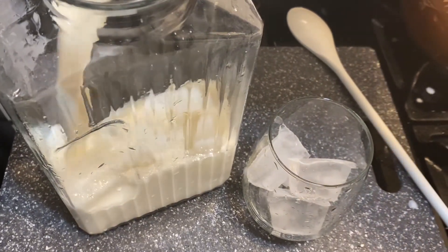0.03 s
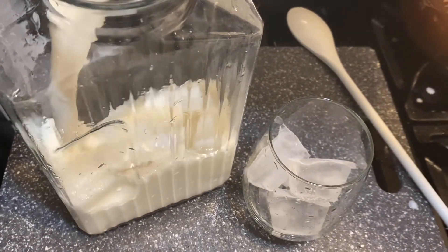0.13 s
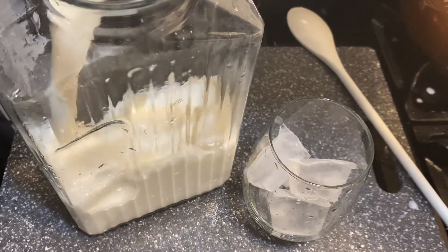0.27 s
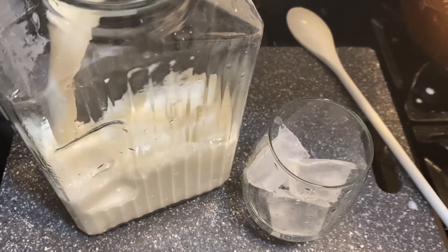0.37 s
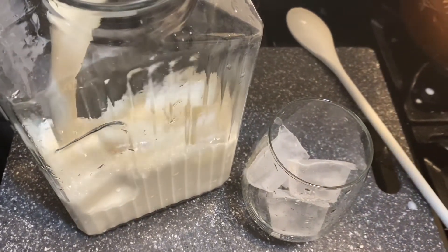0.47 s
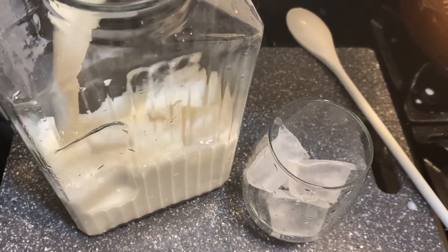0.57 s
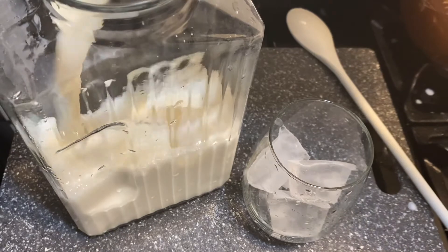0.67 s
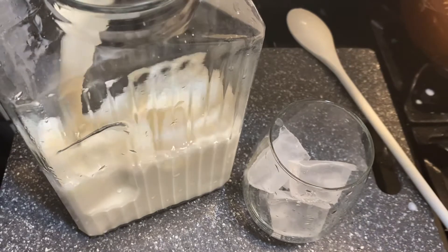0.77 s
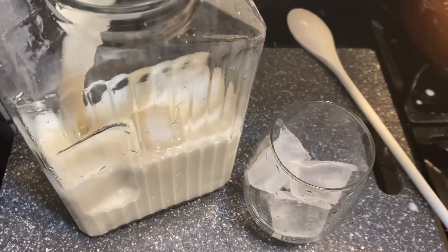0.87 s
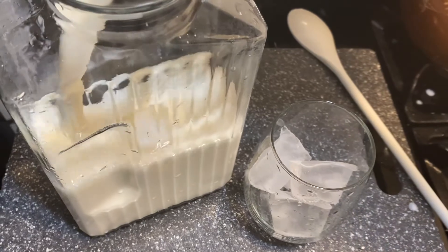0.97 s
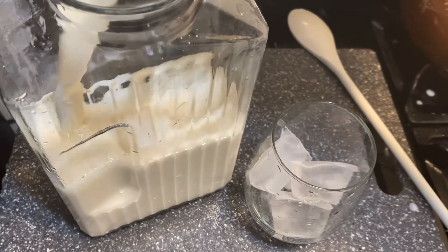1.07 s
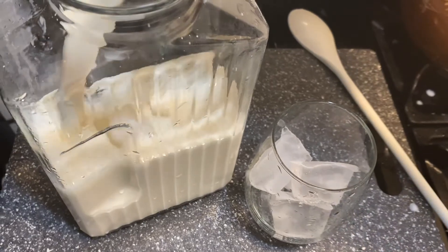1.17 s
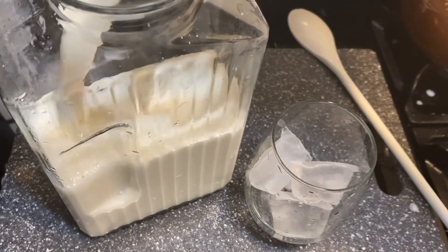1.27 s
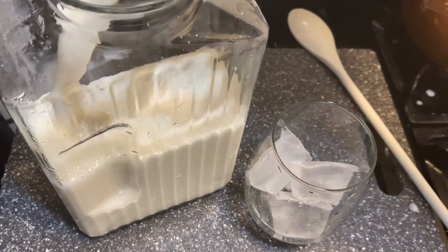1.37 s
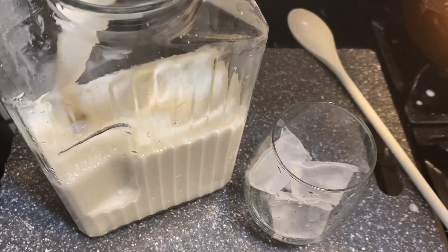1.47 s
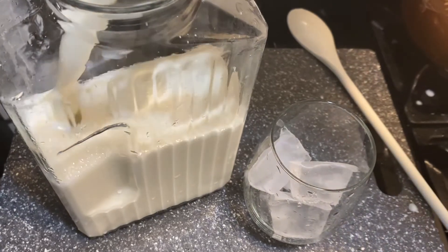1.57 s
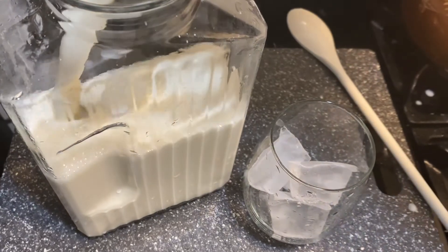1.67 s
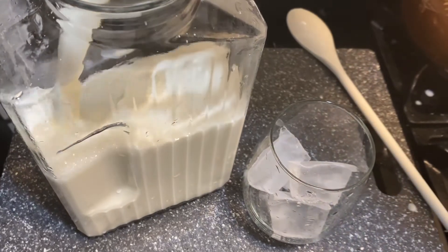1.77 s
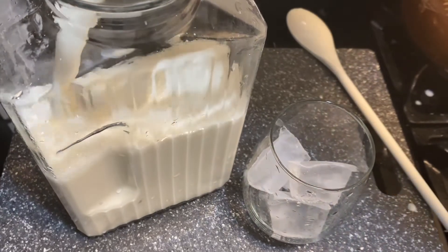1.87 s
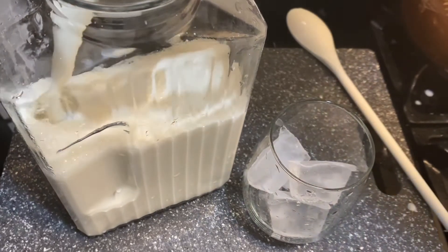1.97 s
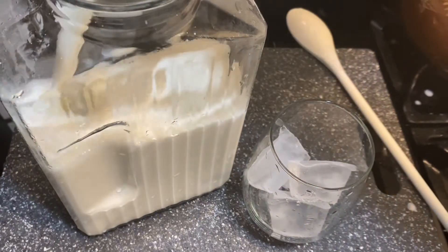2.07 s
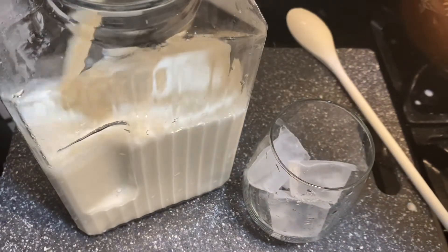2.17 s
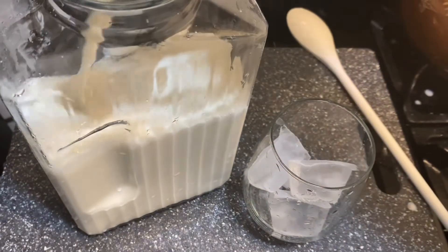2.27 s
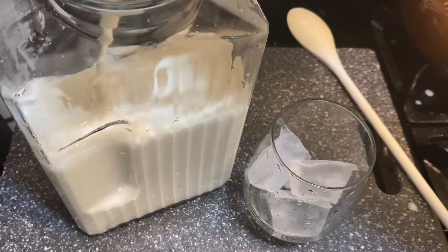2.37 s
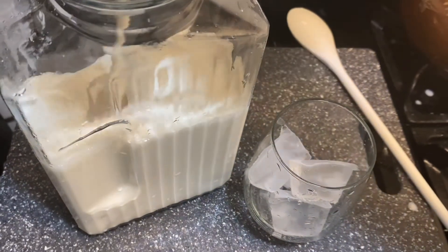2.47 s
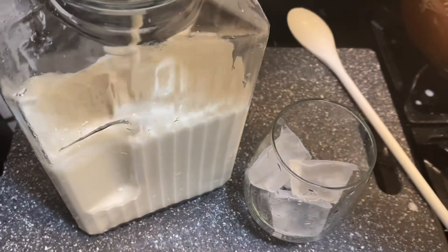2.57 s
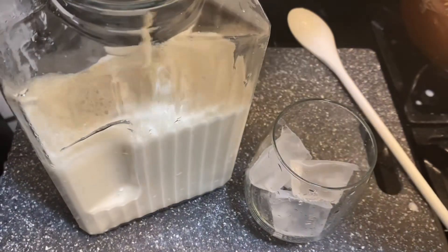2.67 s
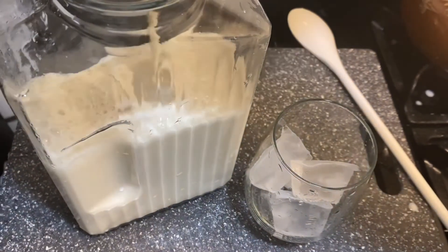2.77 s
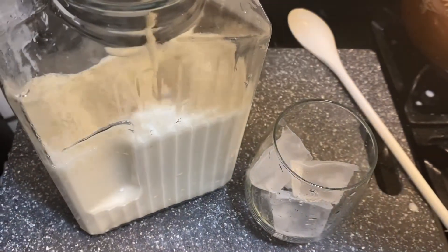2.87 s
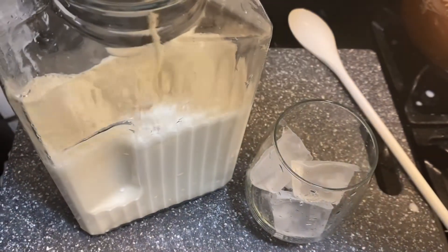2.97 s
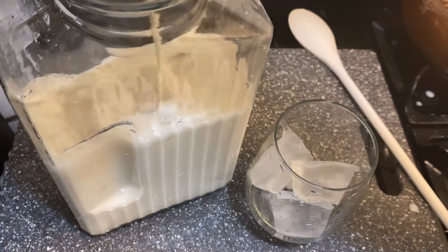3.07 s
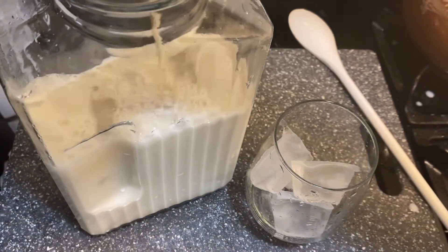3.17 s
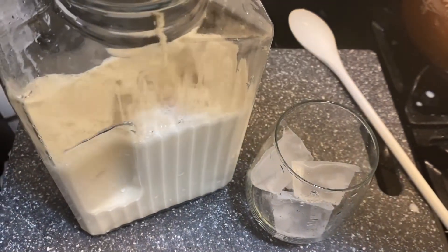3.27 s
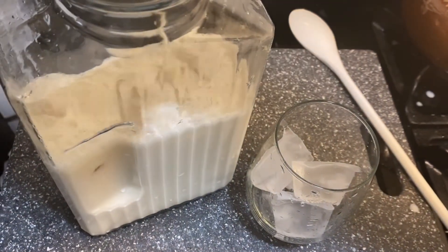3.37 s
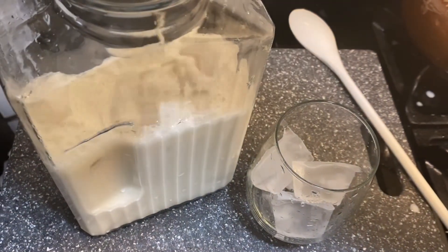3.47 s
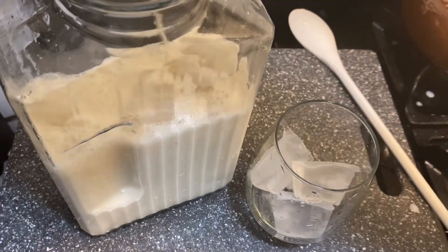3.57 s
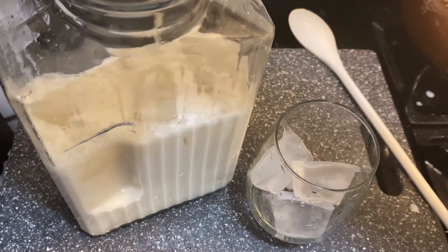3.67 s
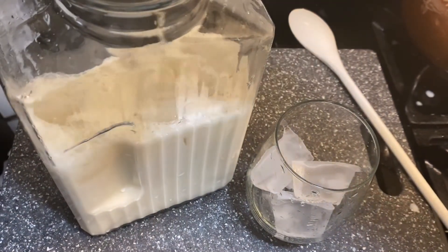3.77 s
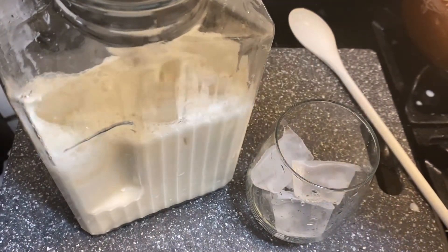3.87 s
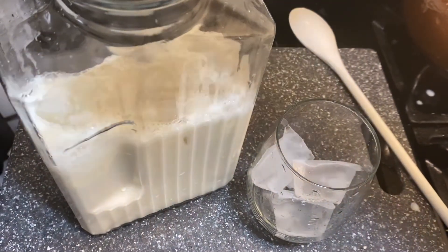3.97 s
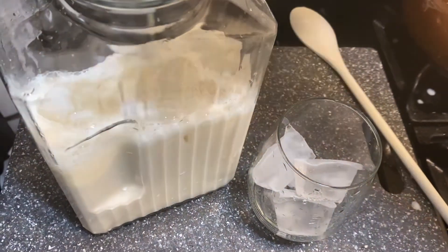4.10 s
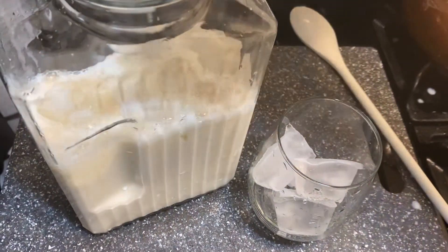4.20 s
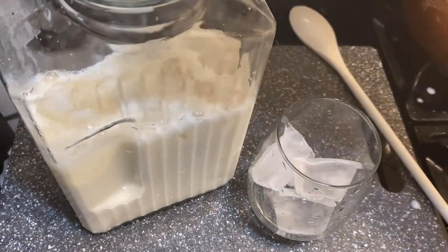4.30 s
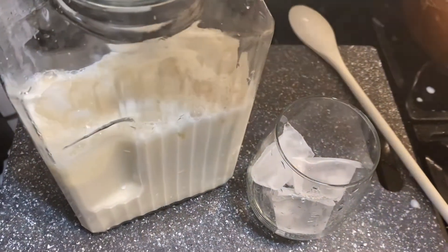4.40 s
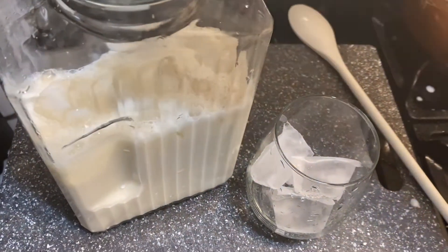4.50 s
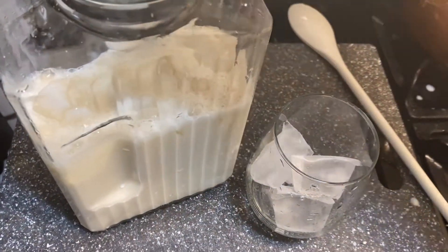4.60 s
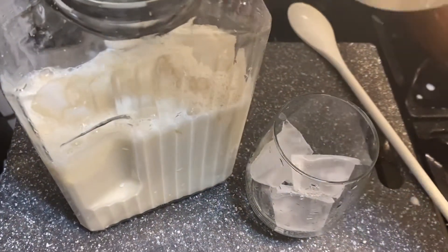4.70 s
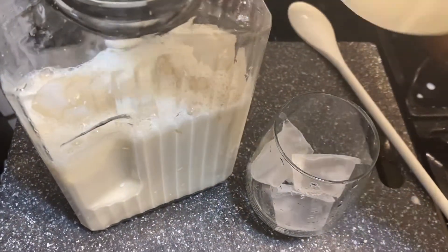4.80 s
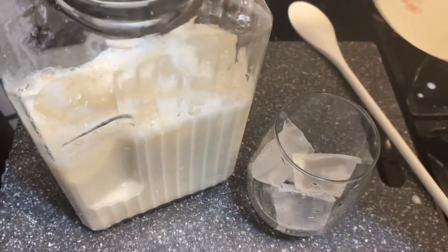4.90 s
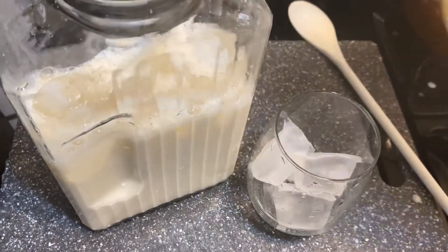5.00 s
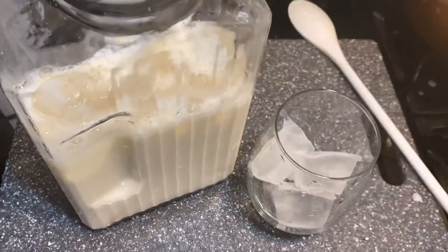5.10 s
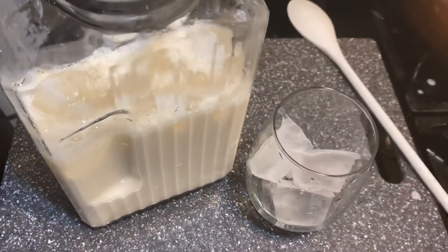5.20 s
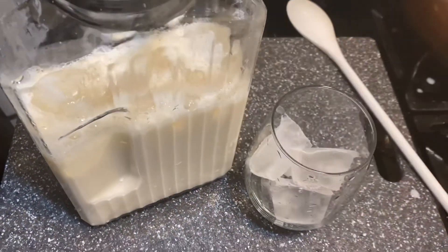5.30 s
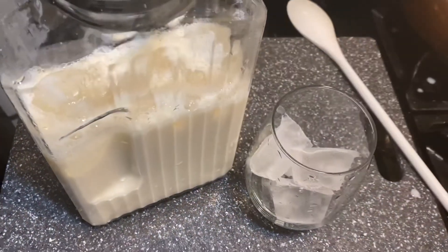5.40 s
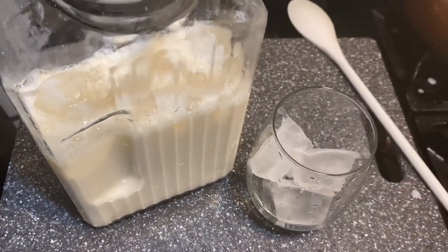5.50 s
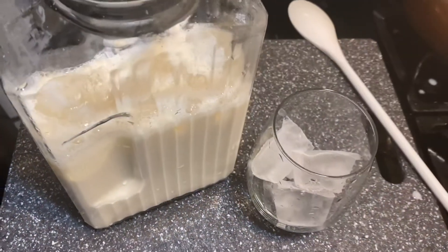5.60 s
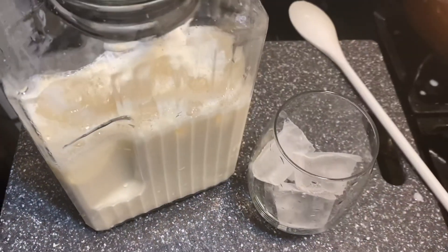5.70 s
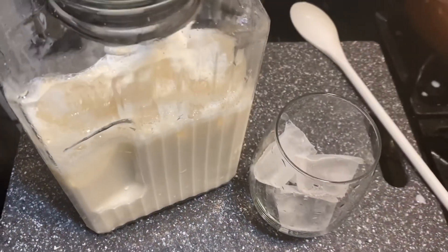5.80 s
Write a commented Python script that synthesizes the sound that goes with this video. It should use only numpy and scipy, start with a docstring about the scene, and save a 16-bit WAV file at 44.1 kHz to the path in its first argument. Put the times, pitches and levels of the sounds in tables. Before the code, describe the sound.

A creamy pour splats in irregular gobs inside a half-filled glass jar, the air glugging at a slowly rising low pitch, with fine spatter and short glassy resonance. The stream breaks into sparse drops and nearly stops. Then a woody, rattling bump with a low boom and brief scrape comes from the counter, slightly right. Near microphone, short dry room echo, soft fridge hum beneath.

```python
"""A thick liquid is poured in uneven gulps into a glass pitcher on a kitchen counter.
Gobs slap the surface: a trapped bubble rings, the contact cracks, a noisy splash follows and the glass is struck.
The air above the liquid glugs as decaying notes, higher as the pitcher fills; small drops patter in between.
Then the emptied container is set down and slid: ringing counter modes, a late boom, rattle and scrape noise.
A refrigerator hums in wavering tones over soft room noise."""
import sys
import numpy as np
from scipy import signal
from scipy.fft import rfft, irfft, next_fast_len
from scipy.io import wavfile

SR = 44100
rng = np.random.default_rng(int(sys.argv[2]) if len(sys.argv) > 2 else 0)


def persist_wave(psi):
    """Save psi, clipped to +-1, as 16-bit WAV."""
    counts = np.round(np.clip(psi, -1, 1) * 32767).astype(np.int16)
    wavfile.write(sys.argv[1], SR, np.atleast_2d(counts).T)


N = 257984


def amp(db):
    """Gain of a level in dB."""
    return 10 ** (np.asarray(db) / 20)


def rms_one(x):
    """Scaled to rms 1."""
    return x / np.sqrt(np.mean(x ** 2) + 1e-20)


def in_time(rows):
    """Columns of a curve table, sample by sample."""
    s, *columns = np.transpose(rows)
    return [np.interp(np.arange(N) / SR, s, c) for c in columns]


def at_hz(points, hz):
    """A spectrum table read on a logarithmic pitch axis."""
    table_hz, values = np.transpose(points)
    return np.interp(np.log(hz), np.log(table_hz), values)


def add(track, s, sound):
    """Mixes a sound in at s seconds."""
    i = round(s * SR)
    track[..., i:i + sound.shape[-1]] += sound[..., :N - i]


def butter(x, hz, kind, order=2):
    """Butterworth filter."""
    return signal.sosfilt(signal.butter(order, hz, kind, fs=SR, output="sos"), x)


def sine(turns):
    """A sine wave whose phase is counted in full turns."""
    return np.sin(2 * np.pi * turns)


def swell_in(t, rise_s):
    """A smooth rise from 0 towards 1."""
    return 1 - np.exp(-t / rise_s)


def ring(x, hz, t60):
    """A unit click sets a sine of height 1 ringing; it falls 60 dB in t60 seconds."""
    r, w = amp(-60 / (t60 * SR)), 2 * np.pi * hz / SR
    return signal.lfilter([0, np.sin(w)], [1, -2 * r * np.cos(w), r * r], x + 1e-18)


def drift(rate_hz):
    """Slow random wandering of rms 1: low-passed noise made at every 40th sample, then joined by lines."""
    r = np.exp(-80 * np.pi * rate_hz / SR)
    noise = rng.standard_normal(N // 40 + 2002)
    slow = signal.lfilter([1], [1, -2 * r, r * r], noise)[2000:]   # without the filter's start
    return np.interp(np.arange(N) / 40, np.arange(len(slow)), rms_one(slow))


def pair(length, alike):
    """Stereo white noise; likeness 1 makes both sides equal, 0 unrelated, -1 opposite."""
    mid, side = rng.standard_normal((2, length))
    alike = np.clip(alike, -1, 1)
    return np.sqrt(.5 + alike / 2) * mid + np.sqrt(.5 - alike / 2) * side * [[1], [-1]]


def coloured(spectrum, likeness, patchy_db):
    """Half-octave bands of stereo noise, each with its level, flicker and likeness; rms 1."""
    out, edges = 0, 25 * 2 ** np.arange(0, 9.6, .5)
    white = rng.standard_normal((2, 2, N))   # neighbouring bands use different noise
    for k, (low, high) in enumerate(zip(edges, edges[1:])):
        mid, side = butter(white[k % 2], [low, high], "band")
        hz = np.sqrt(low * high)
        alike = np.clip(at_hz(likeness, hz), -1, 1)
        gain = amp(at_hz(spectrum, hz) + patchy_db * drift(8.4))
        out = out + gain * (np.sqrt(1 + alike) * mid + np.sqrt(1 - alike) * side * [[1], [-1]])
    return rms_one(out)


# Colour of the room tone. Each row: pitch in Hz, relative level in dB per Hz.
KITCHEN = [(20, -25), (59, -6.5), (175, -11), (242, -8.5), (439, -17.5), (607, -20), (1650, -30),
           (2600, -36.5), (4900, -40), (7500, -40.5), (11000, -50), (16000, -50.5)]
# How alike the room tone is on both sides. Each row: pitch in Hz, likeness (1 is equal).
KITCHEN_LIKENESS = [(60, .9), (130, 0), (290, .7), (640, 0), (1400, 0), (3100, .5), (7000, .95)]
# Motor tones. Each row: pitch in Hz, speed of the wavering in Hz, level in dB.
HUM = [(65, 12, -64.5), (240.1, 20, -53.5), (415.5, 65, -63), (1630, 3.8, -74)]
KITCHEN_DB = -48   # level of the room tone


def refrigerator():
    """Motor tones that waver in strength and phase, over the room tone."""
    t, tones = np.arange(N) / SR, 0
    for hz, width_hz, db in HUM:
        waver = 1 + drift(width_hz) + 1j * drift(width_hz)
        tones = tones + amp(db) * (np.exp(2j * np.pi * hz * t) * waver).real
    return tones + amp(KITCHEN_DB) * coloured(KITCHEN, KITCHEN_LIKENESS, patchy_db=.4)


ROOM_T60_S, ROOM_DB, WALL_CUT_HZ = 0.18, -8.5, 2400   # echo decay, echo gain, dulling on each round


def room(x):
    """Eight feedback delays a side, duller on every round."""
    size = next_fast_len(N + SR)
    hz = np.fft.rfftfreq(size, 1 / SR)
    spectrum, out = rfft(x, size), np.zeros((2, len(hz)), complex)
    for k, lag in enumerate(rng.uniform(.012, .04, 16)):   # seconds
        dulling = 1 / (1 + 1j * hz / WALL_CUT_HZ)
        loop = amp(-60 * lag / ROOM_T60_S) * dulling * np.exp(-2j * np.pi * hz * lag)
        out[k % 2] += loop / (1 - loop) * (-1) ** (k // 2)
    return irfft(out * spectrum, size)[:, :N]


# Knocks of the container on the counter. Each row: start in seconds, level in dB,
# rattle in dB against that level, boom gain in dB against that level, favoured pitch in Hz.
KNOCKS = [(5.314, -27, 6, 7.5, 400), (5.336, -34, -2.5, 2, 200), (5.436, -40, -1.5, 5, 635),
          (5.542, -40, 3, 5, 416), (5.556, -35, -14, 9.5, 201), (5.576, -40.5, 5, 0, 378),
          (5.609, -39.5, -2.5, 1, 614)]
# Ringing modes of the counter. Each row: pitch in Hz, relative level in dB, seconds to fall 60 dB.
COUNTER = [(195, 5.5, 0.28), (290.4, -1, 0.21), (329.6, 4, 0.28), (407, -7, 0.58), (624, 2.5, 0.11),
           (815, -2, 0.12), (1610, -2, 0.14), (2520, 6, 0.065), (3010, -2, 0.081)]
# Boom of the cabinet. Each row: pitch in Hz, relative level in dB.
BOOM = [(70, 3.5), (116, -2.5)]
# Loudness of the slide. Each row: time in seconds, level in dB.
SLIDE = [(5.27, -54), (5.31, -40), (5.42, -38.5), (5.5, -46.5), (5.54, -41.5), (5.64, -43), (5.7, -67)]
# Colour of the scrape and rattle. Each row: pitch in Hz, relative level in dB per Hz.
SCRAPE = [(100, -17), (250, 6), (600, -5.5), (1300, -15.5), (2600, -20.5), (5000, -34), (15000, -47.5)]
CONTACT_S = 0.0016          # a knock swells briefly
FAVOUR_DB_PER_OCTAVE = 4.5  # modes far from the favoured pitch are weaker


def container():
    """Knocks ring the counter and rattle; the cabinet booms late; a soft scrape as it slides."""
    out, t = np.zeros((2, N)), np.arange(SR // 3) / SR
    (slide_db,) = in_time([(0, -120), (5.2, -120)] + SLIDE)
    rub = amp(slide_db)
    for s, peak_db, rattle_db, boom_db, favoured_hz in KNOCKS:
        blow = swell_in(t, CONTACT_S) * amp(rng.normal(0, 1.1, (2, 1)))
        rings = 0
        for hz, db, t60 in COUNTER:
            far_db = FAVOUR_DB_PER_OCTAVE * abs(np.log2(hz / favoured_hz))
            # each mode strays a little in pitch, and in phase between the sides
            turns = hz * rng.normal(1, 0.0152) * t + rng.random() + rng.normal(0, 0.037, (2, 1))
            rings = rings + blow * amp(db - far_db - 60 * t / t60) * sine(turns)
        late_swell = (t / 0.1) ** 2 * np.exp(2 - 2 * t / 0.054)
        boom = sum(amp(db) * late_swell * sine(hz * t + rng.random()) for hz, db in BOOM)
        add(out, s, amp(peak_db) * butter(rings, [170, 5000], "band") + amp(peak_db + boom_db) * boom)
        add(rub, s, amp(peak_db + rattle_db - 60 * t / 0.098))
    scrape = coloured(SCRAPE, [(100, 0.3), (3000, 0.67)], patchy_db=-1.5)
    rough = amp(2.66 * drift(40))
    return (out + rub * rough * scrape) * amp([[-1], [1]])   # slightly to the right


# Fine spatter between the gobs, and the murmur of the air.
# Each row: time in seconds, spatter level in dB, air murmur level in dB.
SPATTER = [(0, -54, -40), (.1, -55, -80), (.2, -39, -27), (.5, -51.5, -45), (.9, -37, -35),
           (1.3, -43.5, -41.5), (1.5, -52, -46.5), (1.7, -41, -35.5), (2.1, -43.5, -42.5),
           (2.3, -61.5, -52), (3, -59, -43), (3.6, -59, -62), (4.5, -66.5, -54.5)]


def spatter(level_db):
    """Small drops land at random; each swells and rings a few cycles."""
    sizes = amp(3.6 * np.minimum(rng.exponential(1, N), 4)) * rng.choice([-1, 1], N)
    born = rng.random(N) < 2600 * amp(4 * drift(12)) / SR   # about 2600 drops a second, in bursts
    pitches, dealt = np.geomspace(450, 4400, 16), rng.integers(0, 16, N)
    drops = []
    for k, hz in enumerate(pitches):
        clicks = sizes * born * (dealt == k)
        ringing = ring(ring(clicks, hz, 18.0 / hz), hz, 9.0 / hz)   # two in a row make the swell
        drops.append(rms_one(ringing) * (hz / 1000) ** -.7)
    sides = rng.uniform(.4, 1.6, 16)
    both = np.array([np.dot(sides, drops), np.dot(2 - sides, drops)])
    return amp(level_db) * rms_one(both)


# Low thumps of the pitcher under some gobs. Each row: start in seconds, level in dB.
THUMPS = [(0.289, -19.5), (0.717, -30.5), (0.831, -23.5), (0.899, -24), (1.163, -27.5), (1.304, -27),
          (1.425, -26.5), (1.574, -17.5), (1.6559, -25), (1.7349, -16), (1.8434, -26.5), (1.969, -25.5),
          (2.207, -34), (4.13, -30.5)]
THUMP_HZ, THUMP_T60_S = 193.2, 0.16   # pitch, seconds to fall 60 dB


def thumps():
    """One low mode swells and dies at each thump."""
    out, t = np.zeros(N), np.arange(SR // 5) / SR
    for s, peak_db in THUMPS:
        add(out, s, amp(peak_db - 60 * t / THUMP_T60_S) * swell_in(t, 0.012) * sine(THUMP_HZ * t))
    return out


# Cavities that open behind a gob and fall in pitch.
# Each row: start in seconds, level in dB, first pitch in Hz, last pitch in Hz.
PLUNGES = [(0.5335, -31.5, 1600, 606), (1.4226, -28.5, 1520, 504.7), (1.7389, -5.5, 1876, 540),
           (2.209, -37, 1630, 636), (2.736, -42, 1490, 592)]
PLUNGE_FALL_S, PLUNGE_T60_S = 0.0011, 0.053   # time constant of the fall, seconds to fall 60 dB
BUBBLE_SWELL_S = 0.00025   # onset of plunges and trapped bubbles


def plunges():
    """A note that drops quickly and dies."""
    out, t = np.zeros(N), np.arange(SR // 10) / SR
    for s, peak_db, start_hz, end_hz in PLUNGES:
        turns = end_hz * t + (start_hz - end_hz) * PLUNGE_FALL_S * swell_in(t, PLUNGE_FALL_S)
        add(out, s, amp(peak_db - 60 * t / PLUNGE_T60_S) * swell_in(t, BUBBLE_SWELL_S) * sine(turns))
    return out


AFTER_COUNT, AFTER_WITHIN_S, AFTER_DB = 8, 0.03, -6.5   # bubbles per gob, time spread, dB against the splash
AFTER_RISE = 0.74      # the pitch rises by twice this share per second
BUBBLE_CYCLES = 22     # a bubble falls 60 dB in this many cycles
SPLASH_T60_S = 0.17    # seconds for a splash to fall 60 dB


def after_bubbles():
    """Each splash leaves a few bubbles of nearby size that ring briefly, rising in pitch."""
    out, t = np.zeros((2, N)), np.arange(SR // 32) / SR
    for s, peak_db, gob_hz, _, splash_db in SLAPS:
        for late, pitch, size, side in rng.random((AFTER_COUNT, 4)):
            hz, late_s = gob_hz * 2 ** (1.6 * (pitch - .4)), late * AFTER_WITHIN_S
            envelope = swell_in(t, 2 / hz) * amp(-60 * t * hz / BUBBLE_CYCLES)
            blip = envelope * sine(hz * t * (1 + AFTER_RISE * t))
            db = peak_db + splash_db + AFTER_DB + 12 * (size - .5) - 60 * late_s / SPLASH_T60_S
            add(out, s + 0.024 + late_s, amp(db) * blip * [[.5 + side], [1.5 - side]])
    return out


# Pushes on the air in the pitcher.
# Each row: time in seconds, level in dB, cross mode in dB against that level.
GLUGS = [(0.124, -26, -12), (0.152, -11.5, 1.5), (0.184, -13.5, 9), (0.234, -24, -14), (0.316, -11.5, 5.5),
         (0.433, -27.5, 12), (0.536, -50.5, 30), (0.631, -24, 5.5), (0.688, -43, 27.5),
         (0.763, -31.5, 12.5), (0.793, -21, 4), (0.817, -21.5, -11), (0.841, -17.5, -2), (0.887, -29, -6),
         (0.93, -33, 15.5), (1.167, -28.5, 10), (1.238, -32, 3.5), (1.31, -32.5, 15), (1.424, -30.5, 7),
         (1.578, -32.5, -9), (1.663, -40.5, 21.5), (1.746, -14.5, 6), (1.85, -22, -33), (1.982, -11.5, -11),
         (2.009, -13, -15), (2.035, -8.5, -11.5), (2.215, -35.5, -1.5), (2.262, -37, -17), (2.327, -38, 0),
         (2.44, -33.5, 3), (2.472, -21, -9), (2.501, -33, -5), (2.744, -24.5, -5.5), (2.853, -27.5, -7),
         (2.912, -24, -5.5), (3.061, -23.5, 5.5), (3.137, -27.5, -1.5), (3.586, -37.5, -8),
         (3.663, -40, -3), (3.857, -36, 0), (4.129, -35, -22), (4.376, -34, -28)]
# Note of the air as the pitcher fills. Each row: time in seconds, pitch in Hz.
AIR = [(0, 266.2), (.35, 280.6), (1.2, 303.6), (2, 342.5), (2.45, 355.2), (2.75, 371.7), (4.5, 378.2)]
GLUG_RISE_S, GLUG_T60_S = 0.0012, 0.084
# each glug starts sharp by a share, settles (time constant in seconds), and strays by up to a share
GLUG_SAG, GLUG_SAG_S, GLUG_SCATTER = 0.08, 0.015, 0.026
TWIN_GAP_HZ, TWIN_SHARE = 27, .55   # the air has a second mode close above
CROSS_HZ, CROSS_T60_S, CROSS_SCATTER = 558.8, 0.061, 0.035   # the cross mode strays by up to a share


def glugs(air_db):
    """The air swells into its twin note after each push and dies, with a cross mode sounding along."""
    out, t = np.zeros(N), np.arange(SR // 5) / SR
    for (s, peak_db, cross_db), phase in zip(GLUGS, rng.uniform(0, 2 * np.pi, (len(GLUGS), 3))):
        hz = np.interp(s, *np.transpose(AIR)) * (1 + GLUG_SCATTER * np.sin(phase[2]))
        bent = t + GLUG_SAG * GLUG_SAG_S * swell_in(t, GLUG_SAG_S)   # time runs fast at first
        swell = swell_in(t, GLUG_RISE_S) * amp(-60 * t / GLUG_T60_S)
        # the twins are opposed at first: swell, dip, return
        twins = swell * (1 - TWIN_SHARE * np.exp(2j * np.pi * TWIN_GAP_HZ * t))
        carrier = np.exp(2j * np.pi * (hz - TWIN_GAP_HZ / 2) * bent + 1j * phase[0])
        note = (twins / abs(twins).max() * carrier).real
        cross_hz = CROSS_HZ * (1 + CROSS_SCATTER * np.cos(phase[2]))
        cross_swell = swell_in(t, 0.0027) ** 2 * amp(cross_db - 60 * t / CROSS_T60_S)
        cross = cross_swell * np.sin(2 * np.pi * cross_hz * bent + phase[1])
        add(out, s - .005, amp(peak_db) * (note + cross))   # starts 5 ms ahead of the listed time
    # the stream keeps the air murmuring: narrow noise carried on the moving resonance
    carrier = np.exp(2j * np.pi * np.cumsum(in_time(AIR)[0]) / SR)
    murmur = carrier * (drift(61) + 1j * drift(24))
    return out + amp(air_db) * murmur.real / np.sqrt(2)


# Ringing modes of the glass. Each row: pitch in Hz, relative level in dB, seconds to fall 60 dB.
PITCHER = [(753, 0, .06), (936, 0, .06), (1292, -2, .045), (1555, 0, .055), (1825, -2, .05), (2312, 1, .05),
           (2910, 1, .04), (3381, 0, .035), (3900, -3, .03)]


def pitcher(x):
    """The glass adds its modes to what happens inside."""
    modes = sum(amp(db) * ring(x, hz, t60) * (-1) ** k for k, (hz, db, t60) in enumerate(PITCHER))
    return x + amp(-45) * modes


# Gobs hitting the surface. Each row: start in seconds, level in dB, bubble pitch in Hz,
# treble in dB against that level, splash in dB against that level.
SLAPS = [(0.1079, -7, 1355, -6.5, -1.5), (0.1384, -2.5, 3070, -22, -14), (0.151, -8.5, 3030, -50, -9),
         (0.18, -17.5, 580, -0.5, -11.5), (0.2311, -17.5, 1230, -29, -2.5), (0.2526, -15, 2090, -17, -11),
         (0.286, -10.5, 2360, -8, 1.5), (0.313, -7.5, 2850, -23, -14), (0.3914, -10, 1400, -11.5, -9.5),
         (0.429, -27.5, 3200, -50, 0), (0.4576, -18, 1440, -27, -16), (0.5334, -22, 916, -37, -1),
         (0.564, -22.5, 1430, -46, -11), (0.6204, -13, 1370, -28, -22.5), (0.6286, -7, 3150, -36, -19),
         (0.6798, -21.5, 905, -18, -0.5), (0.6934, -12, 1780, -11.5, -2), (0.7459, -1.5, 1570, -23, -8),
         (0.7633, -9.5, 3000, -39, -3), (0.787, -9, 850, -31, -22), (0.7909, -9.5, 2930, -48, -4),
         (0.829, -15, 850, -38, -3.5), (0.853, -31, 3730, -45, 11.5), (0.899, -21, 1350, -39, -3),
         (0.9363, -18.5, 1200, -47, -3), (0.9541, -19.5, 1460, -17, -6.5), (1.044, -32, 1587, -13, -6),
         (1.06, -12.5, 1390, -29, -20), (1.104, -23, 694, -25, -22), (1.163, -5, 1420, -20, -17),
         (1.2678, -13, 1280, -43, -16), (1.2993, -16.5, 1510, -14.5, 5), (1.3896, -26, 1620, -6.5, -1),
         (1.4237, -36, 716, -10, 7.5), (1.5197, -26, 920, -34, 0), (1.552, -25.5, 990, -10, 9),
         (1.574, -0.5, 2160, -9, -9), (1.5975, -12, 2290, -35, -7), (1.657, -10, 1860, -17, -3),
         (1.7387, -4.5, 1260, -28, -14.5), (1.8038, -20, 1500, -45, -9.5), (1.828, -36, 2485, -13, 10.5),
         (1.8453, -21, 815, -19.5, -12), (1.9246, -25, 1480, -53, -20), (1.9731, -25, 1610, -28, 8),
         (2.0262, -7.5, 1365, -17, -4), (2.211, -34, 1172, -35, -3.5), (2.248, -32, 1460, -17, -10),
         (2.321, -35.5, 865, -29, -12), (2.342, -42, 3430, -46, 2), (2.4264, -31.5, 1210, -55, 6.5),
         (2.455, -30, 2020, -27, -10), (2.4883, -27.5, 830, -38, -18), (2.5625, -36.5, 1330, -25, -34),
         (2.643, -32.5, 760, -35, -17), (2.737, -27, 890, -45, -25), (2.834, -38, 1630, -8, 1),
         (2.847, -29, 777, -44, 0), (2.8935, -26.5, 1820, -11.5, -4), (3.034, -39, 1080, -5, -1),
         (3.0555, -6.5, 1337, -19.5, -12), (3.1341, -22.5, 1115, -50, -9), (3.2218, -41, 1500, -40, -13),
         (3.2484, -43, 1880, -43, -4), (3.2786, -39, 2250, -32, -7), (3.3121, -39, 2220, -33, -2),
         (3.3948, -39, 3450, -27, -11), (3.413, -34, 836, -42, -20), (3.4354, -19.5, 1483, -47, -19),
         (3.478, -41, 2900, -40, -4), (3.5045, -40, 2210, -30, 4), (3.569, -37, 2173, -13, -6),
         (3.5901, -22, 2070, -14.5, -7.5), (3.6554, -31.5, 1400, -44, -14), (3.7455, -28, 1970, -15.5, -6),
         (3.8511, -33, 777, -9, -12), (3.9475, -35, 1720, -8, -9), (4.0412, -40.5, 1310, -28, -10),
         (4.13, -37.5, 880, -19, -8), (4.226, -42, 1570, -24, -5), (4.372, -41, 1300, -23, -8)]
SPLASH_LIKENESS = .6   # how alike the splash is on both sides
CRACK_RISE_S, CRACK_FOLLOWS = 0.0003, 0.17   # the crack takes this share of the splash's dB
# a gob strikes the modes nearest its bubble most; each blow strays in dB
STRIKE_DB, STRIKE_DB_PER_OCTAVE, STRIKE_SCATTER_DB = -12.5, 11, 3.5
STRIKE_RING, STRIKE_SWELL_HZ = 0.46, 1500   # share of the modes' decay time; low-pass of the soft contact


def slaps():
    """A trapped bubble rings a few cycles, the contact cracks and strikes the pitcher, a splash dies away."""
    (out, wide, bright), t = np.zeros((3, 2, N)), np.arange(SR // 7) / SR
    modes_hz, strikes = np.array(PITCHER)[:, 0], np.zeros((len(PITCHER), N))
    lumps = amp(2.41 * drift(110))   # the splash breaks into droplets
    for s, peak_db, hz, treble_db, splash_db in SLAPS:
        i = round(s * SR)
        crack_db = CRACK_FOLLOWS * splash_db - 1.5 - 60 * t / 0.05
        crack = pair(len(t), 0.93) * amp(crack_db) * swell_in(t, CRACK_RISE_S)
        splash = pair(len(t), SPLASH_LIKENESS) * amp(splash_db - 60 * t / SPLASH_T60_S) * lumps[i:][:len(t)]
        # extra turns: the note drops in from above as the cavity opens
        glide = 0.4 * swell_in(t, 0.23 / hz)
        turns = hz * t + glide + rng.normal(0, 0.19, (2, 1))
        envelope = swell_in(t, BUBBLE_SWELL_S) ** 2 * amp(-60 * t * hz / BUBBLE_CYCLES)
        bubble = 1.1 * envelope * sine(turns)
        # the part of the splash around the bubble's pitch
        wash = butter(splash, [hz / 1.5, hz * 1.5], "band", order=1) / np.sqrt(hz / 1500)
        far_db = STRIKE_DB_PER_OCTAVE * abs(np.log2(modes_hz / hz))
        near_db = STRIKE_DB - far_db + rng.normal(0, STRIKE_SCATTER_DB, len(modes_hz))
        strikes[:, i] += amp(peak_db + near_db) * rng.choice([-1, 1], len(near_db))
        add(wide, s, amp(peak_db) * (crack + splash))
        add(bright, s, amp(peak_db + treble_db) * (crack + splash / 3))
        add(out, s, amp(peak_db) * (bubble + amp(-12.0) * wash))
    wide = butter(butter(wide + 1e-18, [500, 4200], "band"), 3400, "low")
    bright = butter(bright + 1e-18, [5600, 7800], "band", order=1)
    bright = butter(bright, [4500, 9000], "band", order=1)
    struck = 0
    for clicks, (hz, db, t60) in zip(strikes, PITCHER):
        struck = struck + amp(db) * (hz / 1000) * ring(clicks, hz, STRIKE_RING * t60)
    return out + amp(-6.5) * wide + bright, butter(struck, STRIKE_SWELL_HZ, "low", order=1)


# Which side the pour leans to. Each row: pitch in Hz, left minus right in dB.
POUR_BALANCE = [(60, -1), (180, 1.5), (550, 3.5), (2000, 5), (4500, 2.5), (8000, 0)]


def scene():
    """The pitcher stands to the left; the room answers."""
    spatter_db, air_db = in_time(SPATTER + [(4.7, -90, -90)])
    wet, struck = slaps()
    inside = wet + plunges() + after_bubbles() + thumps() + spatter(spatter_db)
    pour = butter(struck + pitcher(inside) + glugs(air_db), 120, "high")
    lean = amp(at_hz(POUR_BALANCE, np.fft.rfftfreq(N, 1 / SR) + 1) / 2)
    pour = irfft(rfft(pour) * [lean, 1 / lean], N)
    near = pour + container()
    return near + amp(ROOM_DB) * room(near.mean(0)) + refrigerator()


# Phase between left and right by pitch. Each row: pitch in Hz, half turns by which the left leads.
PHASE_TURNS = [(0, 0), (1400, .33), (4800, 0), (7900, 0), (8400, -1), (9600, -1), (10100, -2), (12200, -2),
               (12600, -3), (14000, -3), (14500, -4)]
OVERLOAD, CUTOFF_HZ = 1.1, 16900   # height at which peaks are rounded; top of the treble


def record(dry):
    """The two channels differ in phase by pitch; peaks are rounded, the top cut."""
    half_turns = np.interp(np.fft.rfftfreq(N, 1 / SR), *np.transpose(PHASE_TURNS))
    turn = np.exp(.5j * np.pi * half_turns)   # each side takes half the difference
    channels = irfft(rfft(dry) * [turn, 1 / turn], N)
    rounded = OVERLOAD * np.tanh(channels / OVERLOAD)
    return signal.sosfilt(signal.cheby2(16, 90, CUTOFF_HZ, fs=SR, output="sos"), rounded)


dry = scene()
out = record(dry)
persist_wave(out)
```